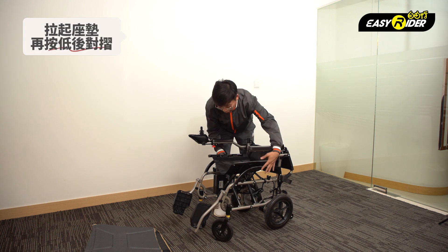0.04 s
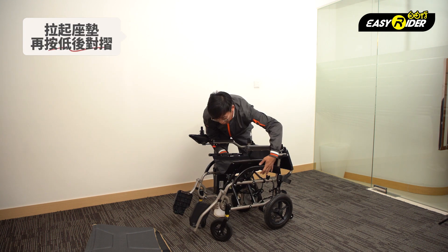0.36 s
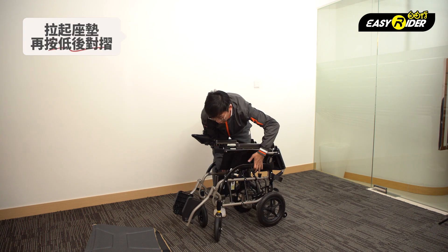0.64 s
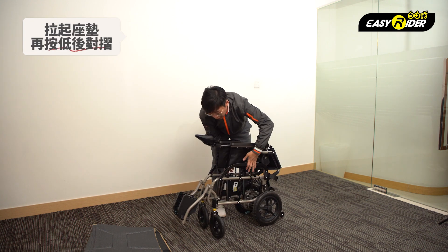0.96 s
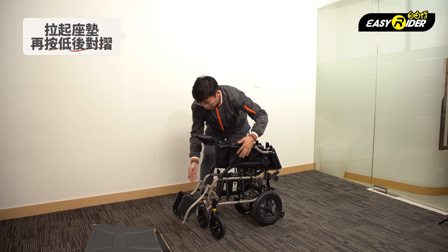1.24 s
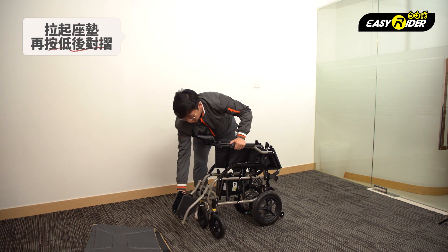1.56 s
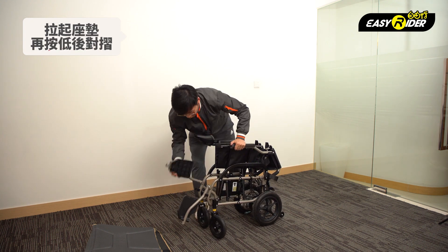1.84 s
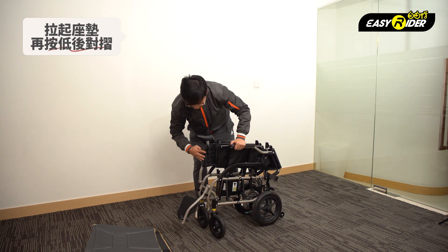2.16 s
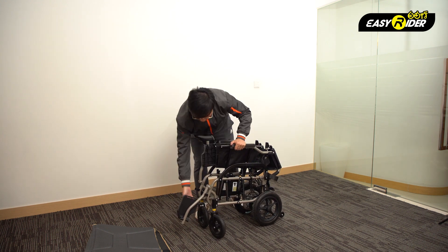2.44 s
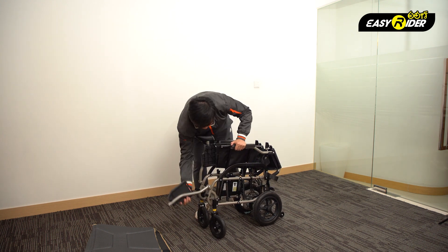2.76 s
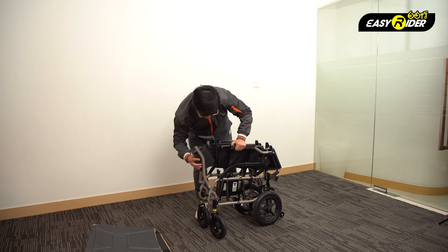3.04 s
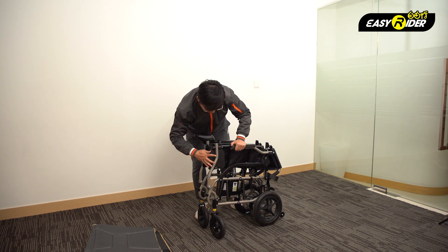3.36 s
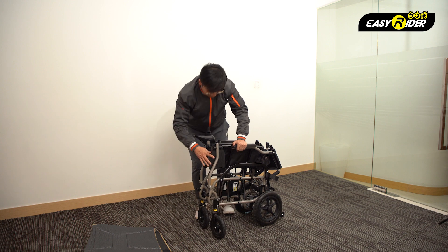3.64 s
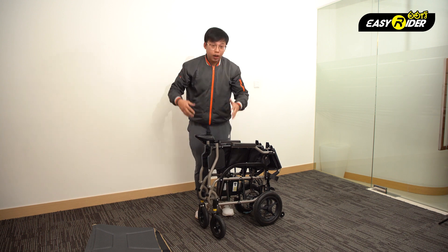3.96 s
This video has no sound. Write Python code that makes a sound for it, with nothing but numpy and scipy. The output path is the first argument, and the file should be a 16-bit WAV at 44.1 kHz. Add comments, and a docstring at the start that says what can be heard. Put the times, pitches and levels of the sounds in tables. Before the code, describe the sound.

Wheelchair footplates flip up with two loud rattling clacks after soft knocks and rustling.

```python
"""Soft knocks and the rustle of a seat and a jacket are heard as a wheelchair frame slides shut.
Then two footplates are flipped up, each with a loud rattling clack, and a metal catch clinks in between.
Each impact excites the damped modes of the part it strikes; friction in cloth and tubes makes noise
from many tiny slips. The carpeted, hard-walled room reverberates over quiet ventilation,
and a mild gain control lowers the level after the clacks."""
import sys
import numpy as np
from scipy import signal
from scipy.fft import rfft, irfft
from scipy.io import wavfile
from scipy.ndimage import uniform_filter1d

SR = 44100
rng = np.random.default_rng(int(sys.argv[2]) if len(sys.argv) > 2 else 0)


def wrap_up_sound(samples):
    """Save the sound to the file named by the first command line argument, as 16-bit audio."""
    columns = np.atleast_2d(samples).T
    # keep every value between -1 and 1, then stretch to whole-number steps
    tamed = np.clip(columns, -1, 1)
    steps = np.round(tamed * 32767).astype(np.int16)
    wavfile.write(sys.argv[1], SR, steps)


N = 176400

# Each plate meets its stop and rebounds.
# Each row: start in seconds, relative energy in dB, bass cutoff in Hz, treble cutoff in Hz.
FIRST_PLATE_BLOWS = [(2.130, -6.5, 3500, 5000), (2.139, 4, 2000, 10000), (2.142, 12.5, 500, 15000),
                     (2.1465, 14, 110, 3530), (2.160, 8.5, 90, 5000)]
SECOND_PLATE_BLOWS = [(3.2198, 4, 2600, 7160), (3.230, 13.5, 497, 15000), (3.236, 11, 80, 8000),
                      (3.251, 12, 90, 2000), (3.294, 12.5, 90, 1800)]
# Broadband response. Each row: frequency in Hz, relative level in dB.
FIRST_PLATE_BODY = [(30, -37), (75, -44), (122, -20), (165, -18.5), (260, -21.5), (340, -14.5), (600, -7.5),
                    (1000, -3.5), (1600, -5), (2400, -10.5), (4500, -10), (8000, -15.5), (11500, -20.5),
                    (16000, -24)]
SECOND_PLATE_BODY = [(30, -46), (78, -52), (115, -20), (160, -25), (210, -11), (260, -18), (350, -13),
                     (560, -12.5), (900, 2.5), (1300, -0.5), (1800, -0.5), (2700, -3.5), (4500, -5.5),
                     (6200, -9.5), (9200, -10.5), (10800, -19.5), (16000, -19)]
# Normal modes. Each row: frequency in Hz, relative peak in dB, 60 dB decay time in seconds.
FIRST_PLATE_MODES = [(320, -7.5, 0.18), (921, 4, 0.092), (1013, 4.5, 0.059), (1070, -1, 0.04),
                     (1485, 0, 0.11), (1737, 6, 0.17), (3475, 1.5, 0.15), (4200, -10, 0.044),
                     (4800, -12, 0.054), (7600, -8, 0.025), (13000, -6, 0.022)]
SECOND_PLATE_MODES = [(326, 1, 0.16), (424, -2.5, .08), (686, 9, 0.071), (758, 8, 0.095), (1009, 11, 0.086),
                      (1266, 3, 0.04), (1530, 6, 0.08), (1725, 8, .1), (1817, 10.5, 0.052),
                      (1980, 2, 0.073), (4290, 4.5, 0.093), (4400, 7.5, 0.13), (4340, 8, 0.11),
                      (8650, -10, .04), (13300, -8, .02)]

def footplates():
    """Impact and rebound: blows in quick succession excite each plate's modes into a rattling clack."""
    first = struck(FIRST_PLATE_BLOWS, FIRST_PLATE_BODY, FIRST_PLATE_MODES, level_db=1.66)
    second = struck(SECOND_PLATE_BLOWS, SECOND_PLATE_BODY, SECOND_PLATE_MODES, level_db=3.06)
    return first + second


# Blows, broadband response and modes of the catch, with the same columns as for the plates.
CLINK_BLOWS = [(2.762, -7, 305, 5000), (2.768, -2.5, 310, 12000), (2.775, -5.5, 493, 14100)]
CLINK_BODY = [(100, -23), (500, -7.5), (1300, -5), (2100, -3), (3400, -4.5), (4000, -6), (4700, 2),
              (6200, -11.5), (9300, -11), (11500, -22), (16000, -24)]
CLINK_MODES = [(1858, 10.5, 0.046), (2130, 6, 0.075), (2960, 4, 0.06), (4200, 9, 0.086), (4430, 8, 0.095),
               (4500, 9, 0.089), (4690, 15.5, 0.086), (4640, 11, .15), (4850, 7, 0.12), (5410, -3, .1),
               (9150, -8, 0.056)]

def catch():
    """Free vibration: three light contacts set the high modes of the metal catch ringing."""
    return struck(CLINK_BLOWS, CLINK_BODY, CLINK_MODES, level_db=0.1)


# Blows, broadband response and modes of the frame, with the same columns as for the plates.
KNOCK_BLOWS = [(.045, -10.5, 260, 2500), (.072, -10, 300, 4000), (.515, -14, 300, 1130),
               (.675, -9, 220, 1800), (.715, -12, 220, 1200), (.942, -12, 910, 6000),
               (1.222, -17.5, 200, 1500), (1.2605, -3.5, 300, 3000), (1.267, -7, 201, 1310),
               (1.305, -9, 50, 800), (1.56, -15, 80, 1000), (2.716, -9, 300, 1490)]
KNOCK_BODY = [(30, -34), (65, -30), (105, -8), (200, -5), (400, -1), (550, -5), (800, -1), (1300, -7),
              (3200, -10.5), (4200, -21.5), (16000, -32)]
KNOCK_MODES = [(125.6, 2.5, 0.44), (471, 0.67, 0.18), (780, 1.5, 0.11), (839, 3.7, 0.098)]

def frame():
    """Soft impact: blows with little treble excite the low modes of the frame."""
    return struck(KNOCK_BLOWS, KNOCK_BODY, KNOCK_MODES, level_db=-3.25)


def struck(blows, body, modes, level_db):
    """Modal resonance: each blow rings a part; glancing contacts are thinner, soft ones duller."""
    out, hz = np.zeros((2, N)), np.fft.rfftfreq(2 ** 14, 1 / SR)
    power = amp(read(body, hz)) ** 2
    for mode_hz, db, t60 in modes:
        detuning = np.pi * (hz - mode_hz ** 2 / (hz + 1)) * t60 / np.log(1000)
        power += amp(db - 3) ** 2 / (1 + detuning ** 2)
    for start, db, thin_hz, dull_hz in blows:
        contact = hz ** 2 / (hz ** 2 + thin_hz ** 2) / (1 + (hz / dull_hz) ** 2)
        ring = minimum_phase(np.sqrt(power * contact))
        blow = amp(db + level_db) * ring / np.linalg.norm(ring)
        add(out, start, room(blow, direct_db=-16.5))
    return out


# Envelope of the rustle. Each row: time in seconds, relative level in dB.
CLOTH_ENVELOPE = [(0, -46.5), (.09, -47), (.2, -54), (.37, -59.5), (.48, -51.5), (.595, -44), (.635, -39),
                  (.77, -41.5), (.84, -41.5), (.87, -33.5), (.915, -46), (.95, -37), (1.005, -56),
                  (1.2, -55), (1.32, -52), (1.48, -52), (1.58, -53), (1.68, -59.5), (1.94, -61),
                  (2.03, -52), (2.12, -73), (2.45, -55.5), (2.65, -52), (2.9, -64), (3.08, -61),
                  (3.18, -46.5), (3.3, -68), (3.75, -52.5), (4, -64)]
# Spectrum of the rustle. Each row: frequency in Hz, relative level in dB.
CLOTH_SPECTRUM = [(25, -52), (70, -35), (250, -13), (600, -7), (1200, -5), (2000, -3), (3300, -5.5),
                  (6000, -8), (9000, -11.5), (12000, -16.5), (16000, -17)]

def fabric():
    """Friction noise: cloth rubs on cloth, swelling as the seat folds."""
    cloth = coloured(slips(), CLOTH_SPECTRUM)
    envelope_db = np.interp(np.arange(N) / SR, *np.transpose(CLOTH_ENVELOPE))
    return unit(cloth) * amp(envelope_db - 1.5)


# Sliding parts. Each row: start and length in seconds, level in dB, centre and half-width in Hz.
TUBE_SLIDES = [(0.656, 0.28, -49.5, 700, 714), (0.592, 0.22, -44, 2130, 1300),
               (0.822, .19, -47.5, 1810, 1290), (1.678, 0.028, -50, 2500, 910),
               (2.36, 0.38, -56, 5550, 650), (2.434, .2, -61, 6660, 160), (3.495, .2, -64, 8370, 700)]

def sliding():
    """Forced resonance: the slips of each tube or hinge drive one band, which swells and fades."""
    t, hz, out = np.arange(N) / SR, np.fft.rfftfreq(N, 1 / SR), np.zeros(N)
    for start, length, db, centre_hz, half_width_hz in TUBE_SLIDES:
        detuning = (hz - centre_hz ** 2 / (hz + 1)) / half_width_hz / 2
        rub = irfft(rfft(slips()) / (1 + detuning ** 2) ** 2, N)
        progress = np.clip((t - start) / length, 0, 1)
        out += amp(db) * unit(rub) * np.sqrt(abs(np.sin(np.pi * progress)))
    return out


def slips(per_second=9000, spread_db=2.5):
    """Stick-slip friction: a dense random train of tiny impulses of uneven size."""
    size = amp(spread_db * np.minimum(rng.exponential(1, N), 4))
    return rng.standard_normal(N) * size * (rng.random(N) < per_second / SR)


def moving(x, direct_db, paths=7, changes_per_s=16):
    """Multipath propagation: a moving source fades from one set of room paths into the next."""
    place, out = np.arange(N) * changes_per_s / SR, np.zeros((2, N))
    for k in range(paths):
        crossfade = np.sin(np.pi / 2 * np.minimum((place - k) % paths, 2))
        out += room(x * crossfade, direct_db)
    return out


# Decay of the room. Each row: frequency in Hz, reverberation time in seconds.
REVERB_TIMES = [(100, 0.54), (260, 0.8), (700, 0.86), (1840, 0.71), (4850, 0.55), (8000, 0.47),
                (12800, .33)]

def room(x, direct_db, scatter_s=0.0011, build_s=0.00067, early_s=0.0052, early_db=-5):
    """Reverberation: direct sound, early reflections and a diffuse tail whose treble dies first."""
    t = np.arange(SR) / SR
    hz, when, spectra = signal.stft(diffuse_noise(SR), SR, nperseg=256)
    decay = amp(-60 * when / read(REVERB_TIMES, hz)[:, None])
    tail = signal.istft(spectra * decay, SR)[1][:, :SR]
    direct = unit(tail * np.exp(-t / scatter_s))  # scattered by nearby tubes and plates
    early_boost = 1 + amp(early_db) * np.exp(-t / early_s)
    tail = unit(tail * (1 - np.exp(-t / build_s)) * early_boost)
    response = (tail + amp(direct_db) * direct) / np.sqrt(SR)
    return signal.fftconvolve(x[None], response, axes=1)[:, :N]


# Spectrum of the room air. Each row: frequency in Hz, relative spectral density in dB.
AIR_SPECTRUM = [(15, -60), (25, -38), (221, -12.5), (267, -8), (368, -7), (433, -3), (631, -8.5), (684, -8),
                (1410, -13.5), (1710, -6.5), (2490, -17), (6920, -21.5), (15500, -28.5)]

def air(level_db=-54):
    """Stationary noise: quiet ventilation and hiss."""
    return amp(level_db) * unit(coloured(diffuse_noise(N), AIR_SPECTRUM))


# Likeness of the two channels. Each row: frequency in Hz, left-right coherence from -1 to 1.
COHERENCE = [(130, 1), (290, 0.99), (640, 0.78), (1410, 0.43), (3100, -0.15), (6800, 0.18), (15000, 0.11)]

def diffuse_noise(samples):
    """Spatial coherence: a diffuse field is alike in the bass at two nearby points."""
    a, b = rfft(rng.standard_normal((2, samples)))
    same = np.clip(read(COHERENCE, np.fft.rfftfreq(samples, 1 / SR)), -1, 1)
    mid, side = a * np.sqrt((1 + same) / 2), b * np.sqrt((1 - same) / 2)
    return irfft([mid + side, mid - side], samples)


def minimum_phase(gain):
    """Minimum phase: the most compact causal impulse response with this magnitude."""
    log_gain = np.log(np.maximum(np.r_[gain, gain[-2:0:-1]], 1e-5))
    return np.fft.ifft(np.exp(np.conj(signal.hilbert(log_gain)))).real


def coloured(x, spectrum):
    """Linear filtering by a table of levels."""
    return irfft(rfft(x) * amp(read(spectrum, np.fft.rfftfreq(N, 1 / SR))), N)


def amp(db):
    """Decibels to amplitude ratio."""
    return 10 ** (np.asarray(db) / 20)


def unit(x):
    """Normalisation to rms 1."""
    return x / np.sqrt(np.mean(x ** 2) + 1e-20)


def read(points, hz):
    """Interpolation on a log-frequency axis."""
    f, value = np.transpose(points)
    return np.interp(np.log(hz + 1), np.log(f + 1), value)


def add(mix, start, sound):
    """Superposition of a stereo sound from a start in seconds."""
    part = mix[:, max(round(start * SR), 0):][:, :sound.shape[1]]
    part += sound[:, :part.shape[1]]


def scene():
    """Superposition: footplates, catch and frame over friction noise and room air."""
    return footplates() + catch() + frame() + moving(fabric() + sliding(), direct_db=-6.5) + air()


def record(dry, threshold_db=-23, duck_share=0.22, release_db_per_s=19.5, cutoff_hz=15900):
    """Compression and band limiting: the gain dips after loud clacks, then a low-pass follows."""
    power = uniform_filter1d((dry ** 2).mean(0), size=300)
    power_db = 10 * np.log10(abs(power) + 1e-12)
    fall = np.arange(N) * release_db_per_s / SR
    held_db = np.maximum.accumulate(power_db + fall) - fall  # each peak is held and sinks steadily
    over_db = np.maximum(held_db - threshold_db, 0)
    duck_db = duck_share * signal.lfilter(np.ones(400) / 400, 1, over_db)
    lowpass = signal.firwin(511, cutoff_hz, window=("kaiser", 9), fs=SR)
    return signal.oaconvolve(dry / amp(duck_db), lowpass[None], "same")


dry = scene()
out = record(dry)
wrap_up_sound(out)
```